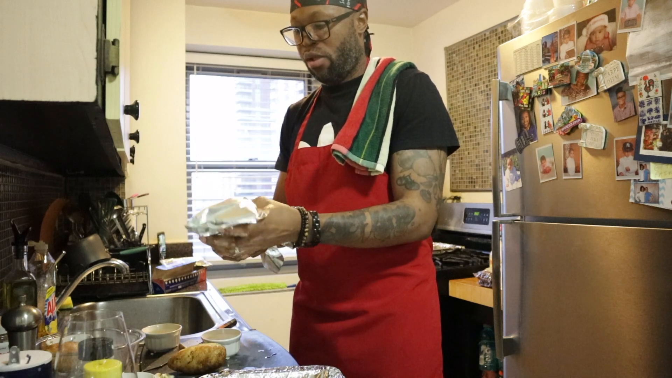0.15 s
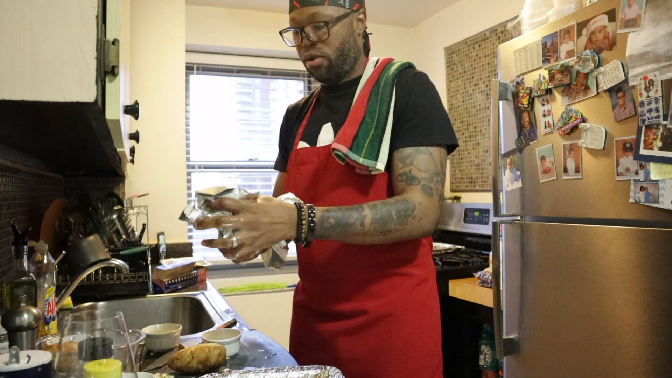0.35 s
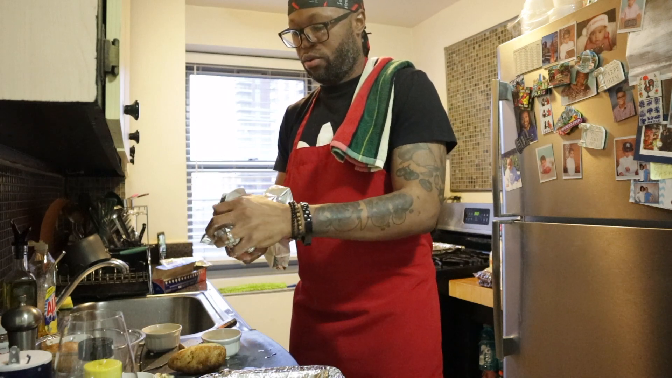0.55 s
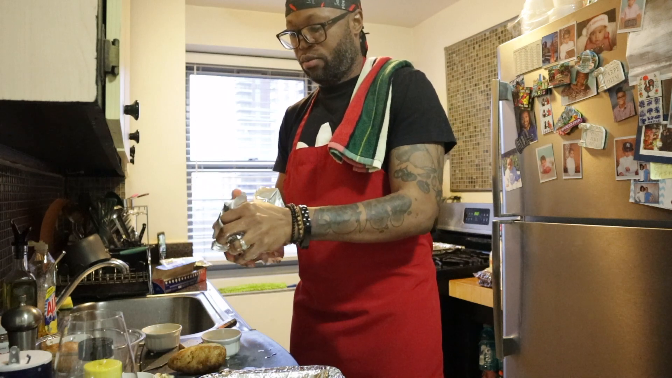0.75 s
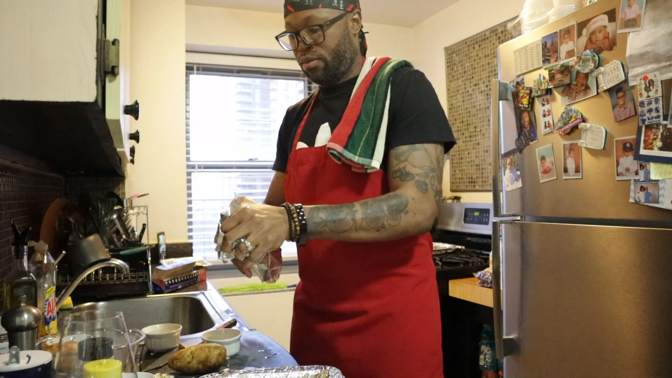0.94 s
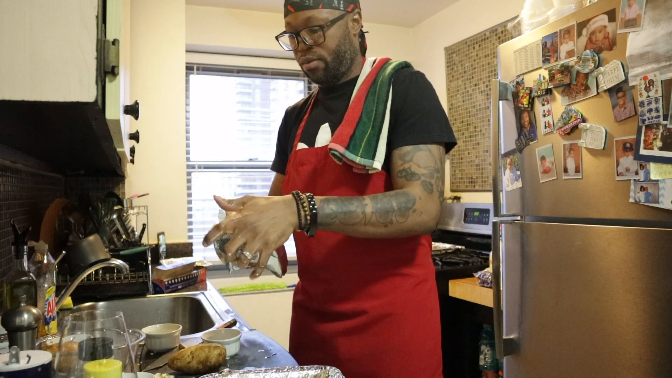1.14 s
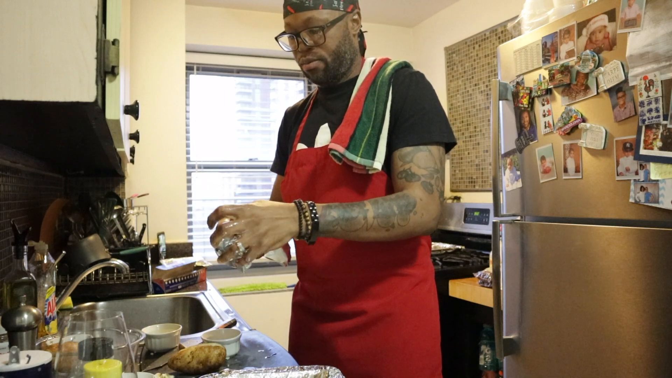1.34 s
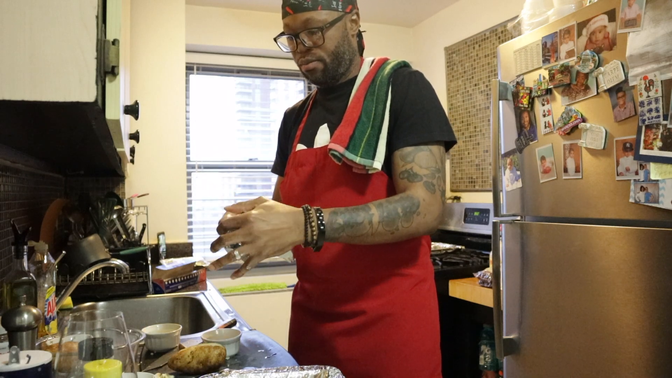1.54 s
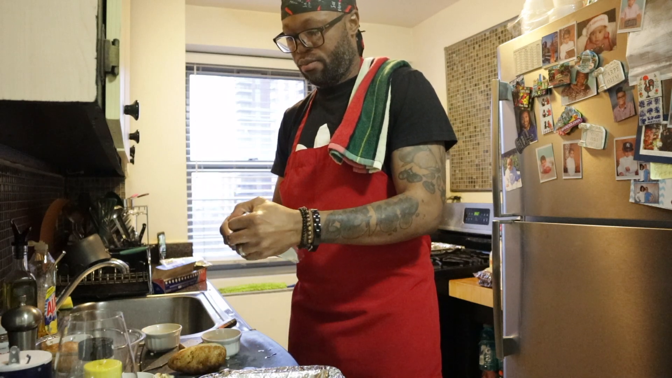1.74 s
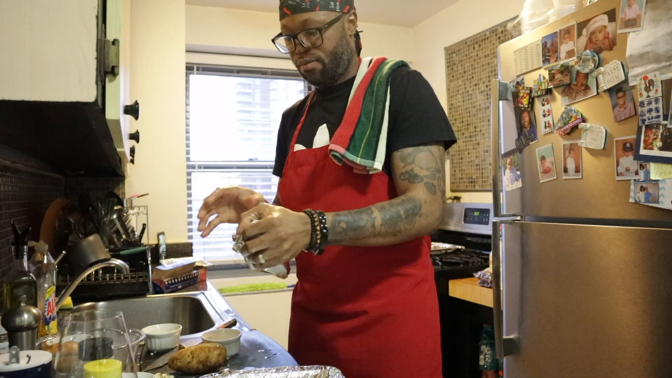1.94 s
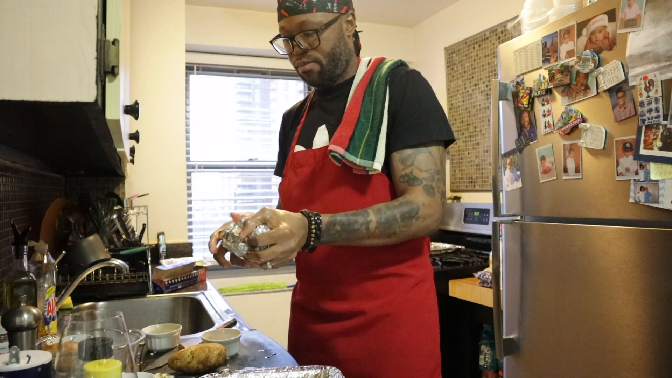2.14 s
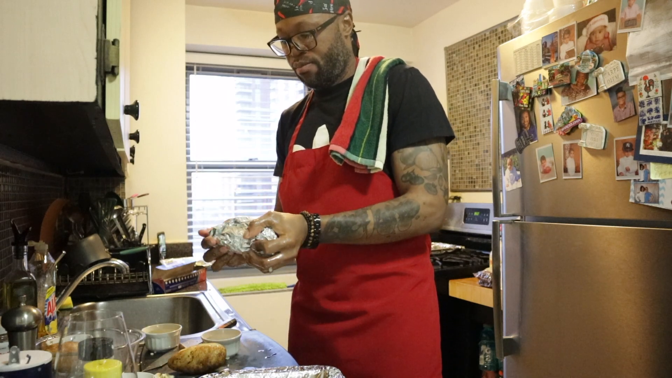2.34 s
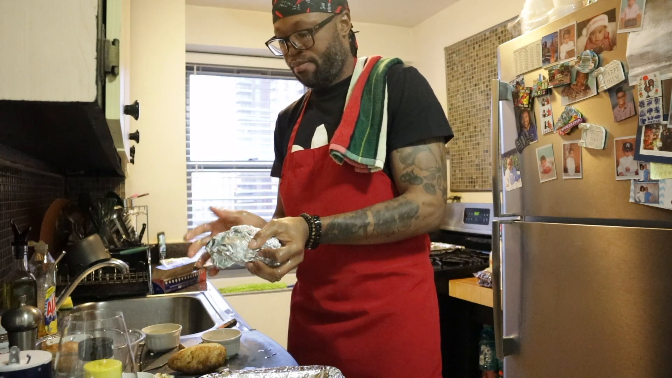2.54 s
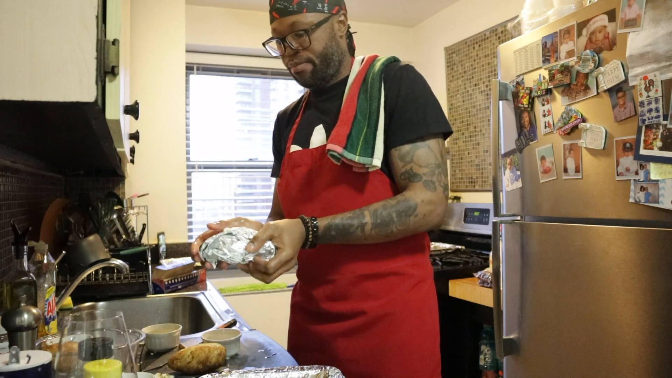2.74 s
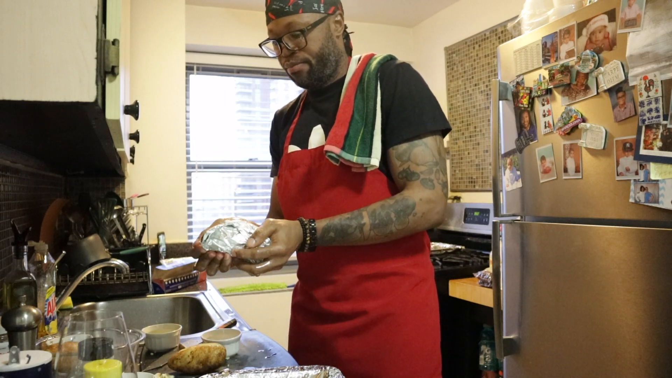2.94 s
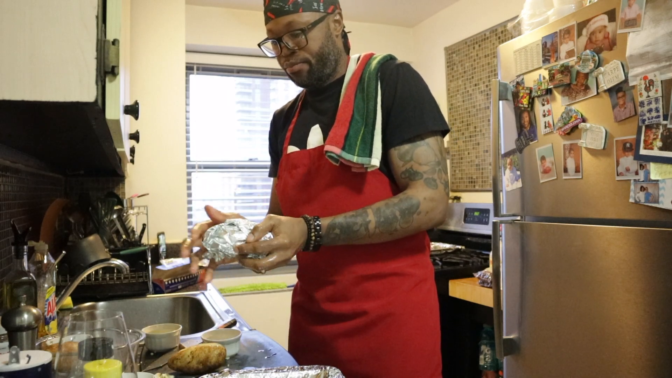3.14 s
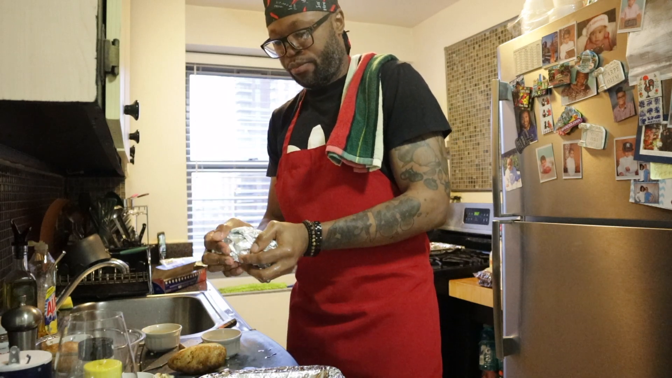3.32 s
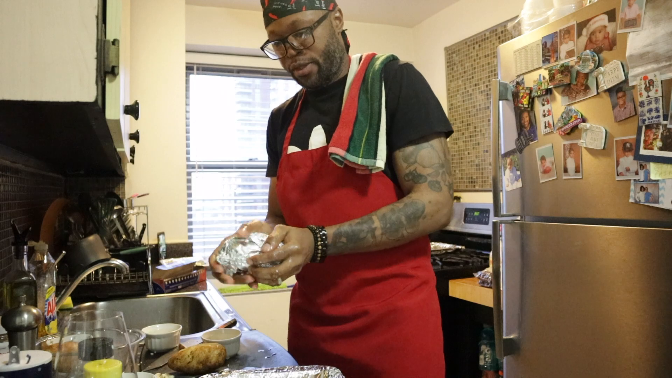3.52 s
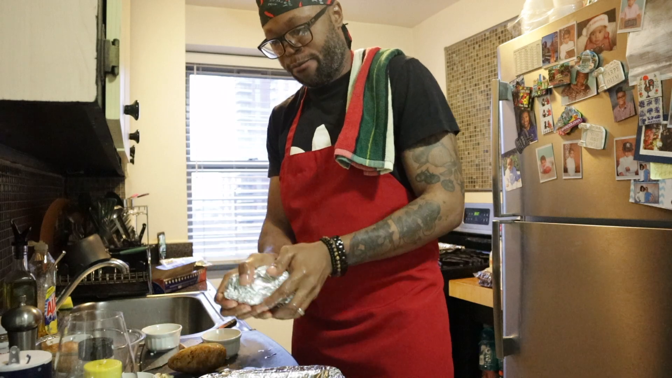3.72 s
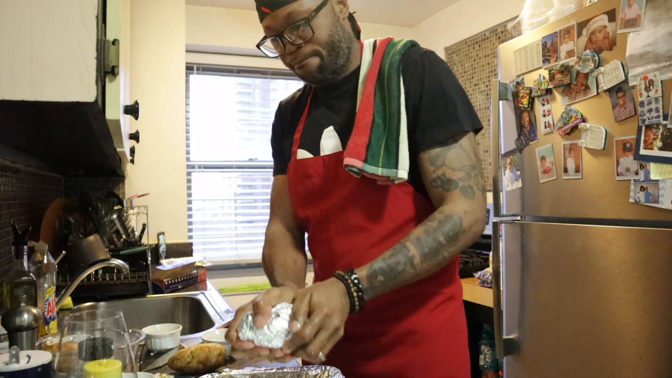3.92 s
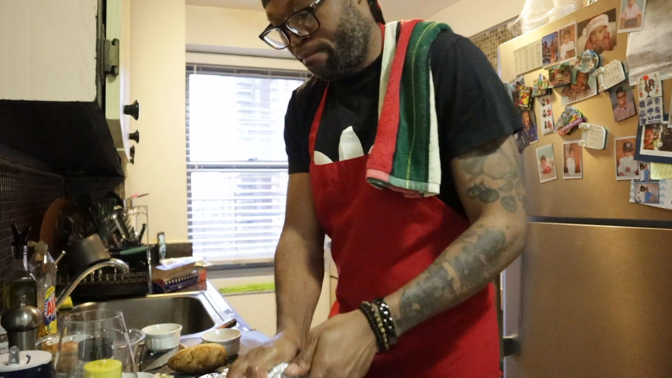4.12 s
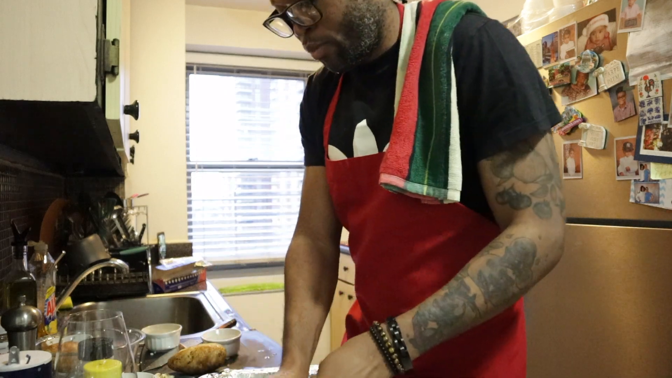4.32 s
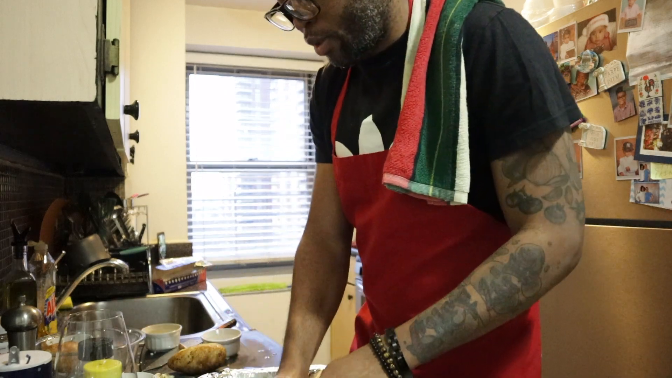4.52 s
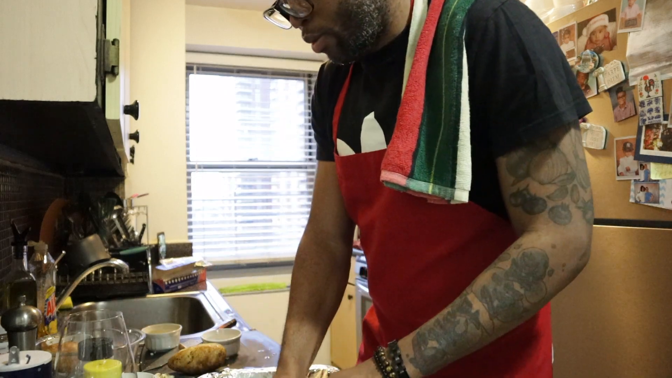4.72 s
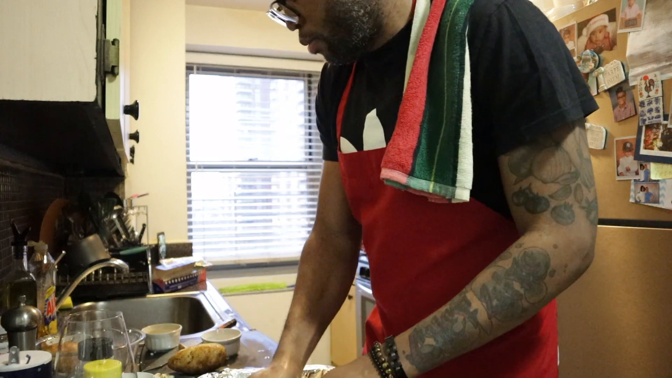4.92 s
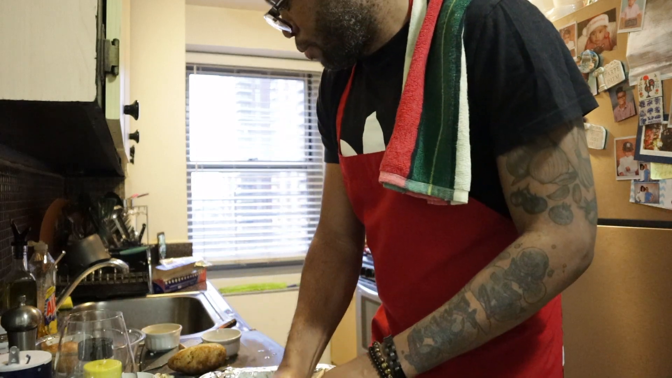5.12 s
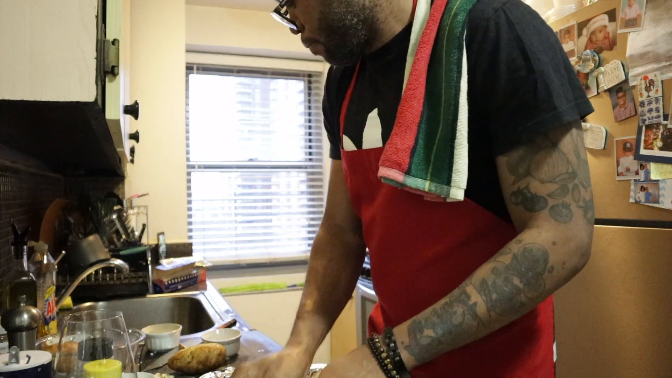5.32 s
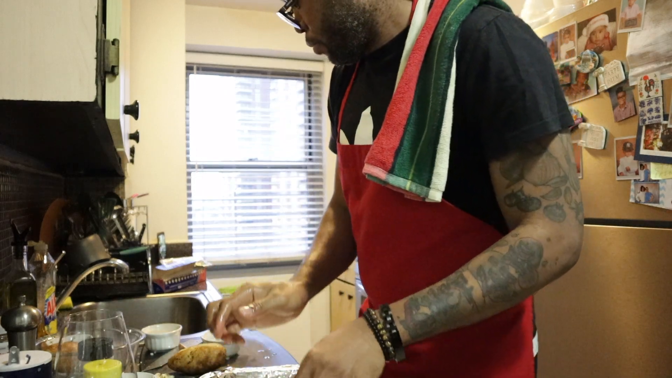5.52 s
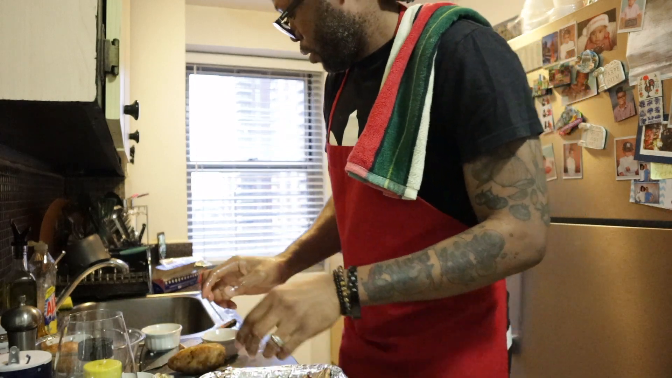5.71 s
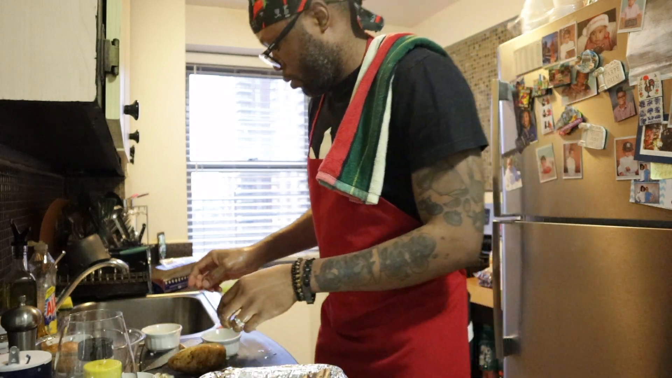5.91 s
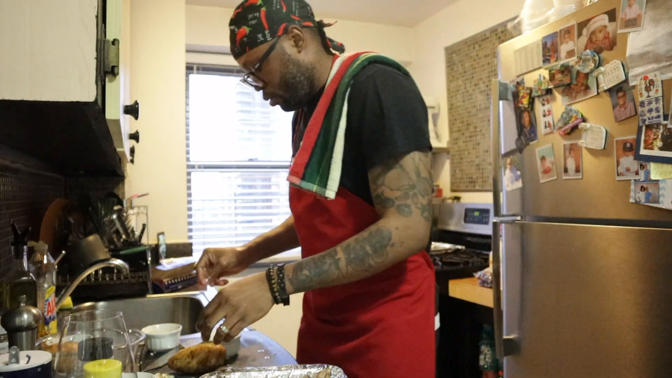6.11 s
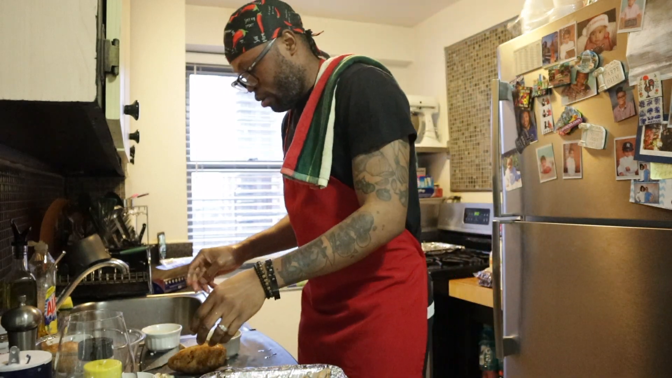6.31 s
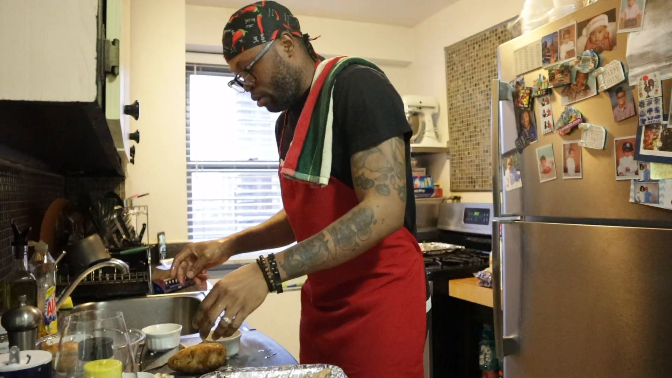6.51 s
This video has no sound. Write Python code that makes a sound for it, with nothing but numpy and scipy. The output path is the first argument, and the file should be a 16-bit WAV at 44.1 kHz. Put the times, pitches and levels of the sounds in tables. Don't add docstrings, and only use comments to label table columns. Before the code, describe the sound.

A small kitchen with a quiet low refrigerator hum and a short, lively echo, heard by a small camera microphone about a step away. From 0 s, aluminium foil is already crumpling loudly: bright, dry crackles in dense clumps, with strong snaps and ticks in the first quarter second and soft palm thumps near 0.2, 0.5 and 0.8 s. Squeezes continue to 2 s, then firmer pressing, patting and crisp popping folds until about 3.25 s. The foil eases to light rustles and small ticks from 3.4 to 4.2 s. Tucking brings louder, sharp snaps and boomier buckles from 4.35 to 5.1 s, thinning away by 5.5 s. Near 5.9 s a small bowl is knocked with short, dull ringing clunks and faint high squeaks, then drags with a gritty rasp, strongest from 6.3 to 6.45 s, ending in a tiny squeak and room hum.

```python
import sys
import numpy as np
from scipy import signal
from scipy.fft import rfft, irfft
from scipy.io import wavfile
from scipy.ndimage import uniform_filter1d

SR = 44100
rng = np.random.default_rng(int(sys.argv[2]) if len(sys.argv) > 2 else 0)


def transcribe(signal):
    frames = np.atleast_2d(signal).T
    limited = np.clip(frames, -1, 1)
    pcm = np.round(limited * 32767).astype(np.int16)
    wavfile.write(sys.argv[1], SR, pcm)


def convert_level_to_amplitude(level_db):
    exponent = np.asarray(level_db, float) / 20
    return 10 ** exponent


N = 289330

# (frequency [Hz], density [dB per Hz])
ROOM_SPECTRUM = [(15, -49), (25, -20), (80, -14.5), (120, -11), (137, -7.5), (157, -11.5), (242, -7.5),
                 (263, -7.5), (301, -8.5), (384, -9.5), (476, -12), (607, -17), (911, -17), (2160, -28.5),
                 (16000, -43)]
# (frequency [Hz], width [Hz], level [dB])
REFRIGERATOR_MODES = [(152.6, 8.3, -53), (85, 25, -58.5), (72.6, 33, -59.5), (241.5, 31, -56),
                      (287.4, 13, -55), (423.7, 18, -57.5)]
# (frequency [Hz], t60 [s])
KITCHEN_DECAY = [(300, 0.31), (1500, 0.36), (5000, 0.26), (14000, 0.15)]
# (frequency [Hz], gain [dB])
MICROPHONE_RESPONSE = [(3000, 0.5), (3600, 4), (4300, -1.5), (5150, 2.5), (6000, 1), (7500, 1)]

# (time [s], pressure [dB])
DRAG_PRESSURE = [
    (5.9, -60),
    (6.0, -50.5),
    (6.04, -44),
    (6.22, -49),
    (6.31, -26.5),
    (6.392, -26),
    (6.494, -35.5),
    (6.56, -53),
]
# (frequency [Hz], density [dB per Hz])
GRIT_SPECTRUM = [(300, -33), (600, -5.5), (1000, -4), (1700, -4.5), (2500, -3), (3600, -4.5), (5500, -8.5),
                 (8500, -23), (12700, -28), (16000, -39)]
# (time [s], peak [dB], clack [dB re peak])
BOWL_KNOCKS = [(5.872, -34, -19), (5.885, -32, -15), (5.897, -36, -5.5), (5.957, -19, -20),
               (5.972, -23, -21), (6.025, -37, -14), (6.225, -30, -16)]
# (frequency [Hz], level [dB], t60 [s])
BOWL_MODES = [(514, 5, 0.047), (724, 6, 0.048), (834, -2, 0.063), (1097, 6, 0.049), (1240, -11, 0.074),
              (2290, -12, .06)]
# (start [s], end [s], start pitch [Hz], end pitch [Hz], level [dB])
BOWL_SQUEAKS = [
    (5.823, 5.895, 11600, 12200, -68),
    (5.93, 5.99, 10000, 10200, -73),
    (6.495, 6.53, 12700, 13000, -64),
]

# (time [s], peak [dB], pitch [Hz])
PALM_PATS = [(.169, -22, 654), (.466, -20.5, 365), (.779, -17, 760), (1.829, -25, 557), (2.111, -21, 385),
             (2.139, -20.5, 500), (2.65, -25, 372), (3.769, -23, 785), (4.619, -32, 776), (.535, -17, 1210),
             (1.167, -20, 1450), (2.25, -14, 1410), (5.335, -27, 2220), (5.878, -30, 540)]
# (frequency [Hz], density [dB per Hz])
FOIL_SPECTRUM = [(290, -26.5), (500, -8.5), (970, 0.5), (2040, -1.5), (3530, -3), (5000, -2.5),
                 (7400, -8.5), (11400, -11), (16000, -17)]
# (time [s], large facets [dB re folds])
FOIL_SLACK = [(0, -5.5), (.9, -7.5), (1.3, -8), (1.7, -11.5), (2.1, -8), (2.3, -7), (2.6, -10), (3.2, -12),
              (3.6, -12), (3.9, -10), (4.2, -4.5), (4.4, -8), (4.6, -4), (5.0, -7.5), (5.6, -6)]
# (time [s], peak [dB])
CREASE_TICKS = [(0.0987, -27), (0.143, -23), (0.158, -11), (0.195, -7.5), (0.8878, -16), (1.0914, -18),
                (1.2894, -19), (1.8058, -25), (1.8362, -22), (2.5028, -15), (2.6458, -19), (2.9238, -23),
                (3.0145, -21.5), (3.1445, -12), (3.5848, -19.5), (3.6526, -23), (3.7678, -26),
                (3.8572, -18.5), (3.917, -21.5), (4.1917, -18), (4.346, -13), (4.472, -13.5), (4.5476, -15),
                (4.585, -9), (4.6246, -12.5), (4.9521, -26), (5.0495, -20), (5.1623, -22), (5.2629, -30),
                (5.4354, -27)]
# (time [s], peak [dB], ring [Hz], fine creases
# [dB re peak])
FOLD_SNAPS = [(0.0285, -18, 2120, -19), (0.0993, -11, 2550, -18), (0.1197, -14, 1940, -15),
              (0.1426, -10, 4830, -15), (0.194, -7, 4800, -18), (0.241, -15, 4870, -17),
              (0.6626, -13.5, 3700, -20), (0.823, -14.5, 3670, -26), (0.8874, -15, 5430, -10),
              (0.938, -18, 3430, -4), (1.0108, -12, 3500, -16), (1.0919, -10.5, 3470, -13),
              (1.167, -16, 2870, 1), (1.226, -14, 2400, -6), (1.2908, -11.5, 3000, -6),
              (1.3858, -18, 3620, -21), (1.4133, -20, 2920, -15), (1.4341, -14.5, 3080, -1),
              (1.514, -24, 3400, -18), (1.5268, -12.5, 3440, -19), (1.5509, -14, 3400, -20),
              (1.6743, -14, 3380, -7), (1.7857, -25, 2680, -11), (1.8074, -20, 3130, -15),
              (1.8382, -20, 3580, -15), (1.8997, -16, 3880, -17),
              (2.0835, -17, 2510, -8), (2.096, -17, 3530, -10), (2.1134, -16, 2280, -18),
                  (2.1855, -11.5, 3530, -13), (2.3072, -13, 3540, -16), (2.3484, -15, 3650, -18),
                  (2.4663, -14, 3420, -9), (2.5024, -19, 3670, -8), (2.5272, -10, 2170, -5),
                  (2.5994, -13, 2700, -0.5), (2.646, -12, 3420, -20), (2.7078, -12, 2670, -16),
                  (2.7753, -8, 2630, -14), (2.8241, -9.5, 3540, -26), (2.865, -27, 3670, -14),
                  (2.8929, -22, 3450, -12), (3.0146, -16.5, 5050, 2.5), (3.059, -22.5, 1980, -17),
                  (3.1149, -11, 2770, -11), (3.1445, -9.5, 3600, -11), (3.195, -11, 3620, -18),
                  (3.2246, -11.5, 3460, -13), (3.4247, -28, 3390, -18), (3.4546, -33, 3520, -9),
                  (3.471, -27, 3400, -13), (3.5757, -28, 3520, -5), (3.5913, -17, 4020, -16),
                  (3.6532, -19.5, 3720, -11),
              (3.7325, -24.5, 3600, -15), (3.7707, -24, 3520, -24), (3.8196, -20, 4790, -2),
                 (3.857, -23.5, 5450, -7), (3.9176, -29.5, 5500, -9), (3.942, -27, 2640, -15),
                 (4.1373, -25, 2360, -15), (4.1516, -21.5, 3520, -19), (4.2022, -18, 3370, -20),
                 (4.3438, -16.5, 5250, -4), (4.3653, -12.5, 4870, 4), (4.4708, -13, 4700, -15),
                 (4.505, -12, 5100, -17), (4.5468, -13, 3770, -1), (4.6226, -11, 3110, -22),
                 (4.6411, -9.5, 3510, -23), (4.6986, -11, 2090, -19), (4.8278, -22, 5330, -17),
                 (4.8451, -14.5, 2430, -23), (4.878, -24, 3400, -16), (4.9031, -9.5, 2340, -3),
                 (4.951, -8, 2390, -1), (4.976, -21, 4170, -16), (5, -14, 3530, -22),
                 (5.0595, -12, 2770, -18), (5.1644, -16, 4400, -17), (5.2413, -22.5, 3720, -13),
                 (5.2655, -24.5, 6360, 2), (5.3246, -20.5, 2250, -18), (5.4341, -27, 2200, -10)]
# (strongest at [s], rise [s], fall [s], level [dB], fine
# creases [dB re level])
FOIL_SQUEEZES = [(0.0, .05, 0.077, -28, -7.5), (0.17, 0.091, 0.062, -22.5, -10.5),
                 (0.35, 0.19, 0.18, -26.5, -9), (0.53, 0.28, 0.21, -26, -8.5),
                 (0.79, 0.17, 0.11, -28.5, -11), (0.95, 0.071, .06, -28, -9),
                 (1.06, 0.11, 0.092, -24, -9.5), (1.17, .01, 0.014, -24, -14),
                 (1.25, 0.044, 0.14, -26.5, -10), (1.55, .13, 0.094, -26, -9.5),
                 (1.67, 0.15, 0.071, -26.5, -9.5), (1.87, .09, 0.088, -25.5, -8.5),
                 (2.119, 0.029, 0.14, -21.5, -9), (2.26, 0.094, .22, -23.5, -10),
                 (2.54, 0.031, 0.16, -33, -11), (2.66, 0.032, 0.082, -25, -8.5),
                 (2.77, 0.13, 0.054, -25.5, -7), (2.93, .09, 0.092, -30.5, -7.5),
                 (3.14, 0.096, 0.036, -34.5, -5.5), (3.23, 0.11, .11, -31, -5),
                    (3.49, 0.051, 0.064, -29.5, -7.5), (3.6, 0.036, 0.19, -36, -7.5),
                    (3.772, 0.0075, 0.017, -27, -10), (3.87, .1, 0.11, -41.5, -2),
                    (4.16, 0.075, 0.031, -39, -5.5), (4.21, 0.028, 0.096, -37.5, -8),
                    (4.386, 0.032, 0.061, -22, -2), (4.52, 0.2, 0.14, -27.5, -8.5),
                    (4.66, 0.13, 0.17, -29.5, -5), (4.86, 0.14, 0.095, -39.5, -6),
                    (4.99, 0.13, .13, -30, -6.5), (5.17, .01, 0.037, -43, -10),
                    (5.27, 0.025, 0.039, -46, -1), (5.33, .015, 0.021, -36, -7),
                    (5.42, 0.12, 0.076, -46, -6)]


def evened(x):
    return x / np.sqrt(np.mean(x ** 2) + 1e-20)


def wander(count, size):
    return evened(uniform_filter1d(rng.standard_normal(count), size))


def read(points, hz):
    f, value = np.transpose(points)
    return np.interp(np.log(hz + 1), np.log(f + 1), value)


def along(rows):
    return np.interp(np.arange(N) / SR, *np.transpose(rows))


def add(mix, s, sound):
    part = mix[round(s * SR):][:len(sound)]
    part += sound[:len(part)]


def butter(order, hz, kind):
    return signal.butter(N=order, Wn=hz, btype=kind, fs=SR, output="sos")


def colour(points):
    hz = abs(np.fft.fftfreq(4096, 1 / SR))
    log_gain = np.log(convert_level_to_amplitude(np.maximum(read(points, hz), -90)))
    return np.fft.ifft(np.exp(np.conj(signal.hilbert(log_gain)))).real[:1024]


def coloured(x, points):
    return signal.oaconvolve(x, colour(points))[:len(x)]


def sizes(x, low_hz=1800, high_hz=6500):
    large = signal.sosfilt(butter(3, low_hz, "low"), x)
    under = signal.sosfilt(butter(3, high_hz, "low"), x)
    middle = signal.sosfilt(butter(3, low_hz, "high"), under)
    fine = signal.sosfilt(butter(3, high_hz, "high"), x)
    return evened(large), evened(middle), evened(fine)


def played(x, large, middle, fine):
    return sum(gain * part for gain, part in zip((large, middle, fine), sizes(x)))


def facet(x, hz, spread):
    edges = np.minimum([hz / spread, hz * spread], [0.4 * SR, 0.45 * SR])
    return 0.74 * x + 1.65 * signal.sosfilt(butter(1, edges, "band"), x)


def buckle(hz, ring_db, crack_t60, ring_t60, size):
    t = np.arange(size) / SR
    crack = facet(rng.standard_normal(size) * convert_level_to_amplitude(-60 * t / crack_t60), hz, spread=1.43)
    rattle = sum(np.sin(2 * np.pi * hz * f * t) for f in rng.uniform(0.76, 1.2, size=6))
    return crack + convert_level_to_amplitude(ring_db - 60 * t / ring_t60) * rattle


def grains(per_s, spread_db, clump_db, clump_s, crack_t60, count=14):
    clumps = wander(N, max(round(clump_s * SR), 2))
    struck = rng.random(N) < per_s / SR
    size = rng.integers(0, count, N)
    strength = np.minimum(rng.exponential(1, N), 4)
    train = convert_level_to_amplitude(spread_db * strength + clump_db * clumps) * struck
    power_decay = convert_level_to_amplitude(-120 / (crack_t60 * SR))
    out = np.zeros(N)
    for k, hz in enumerate(np.geomspace(700, 13000, num=count)):
        dying = signal.lfilter([1], [1, -power_decay], (train * (size == k)) ** 2)
        busy = convert_level_to_amplitude(2.5 * wander(N, round(0.06 * SR)))
        out += facet(busy * np.sqrt(dying) * rng.standard_normal(N), hz, spread=1.63)
    return out


def room_tone():
    hz = np.fft.rfftfreq(N, 1 / SR)
    air = irfft(rfft(rng.standard_normal(N)) * convert_level_to_amplitude(read(ROOM_SPECTRUM, hz)), N)
    out = convert_level_to_amplitude(-45) * evened(air)
    for mode_hz, width_hz, db in REFRIGERATOR_MODES:
        resonance = 1 / (1 + (2 * (hz - mode_hz) / width_hz) ** 2)
        out += convert_level_to_amplitude(db) * evened(irfft(rfft(rng.standard_normal(N)) * resonance, N))
    return out


def kitchen_echo(x, turns_per_s=4.7):
    at, out = np.arange(200, SR // 2 - 20, 20), np.zeros(N)
    for k in range(3):
        taps = np.zeros(SR // 2)
        taps[at + rng.integers(0, 20, len(at))] = rng.choice([-1.0, 1.0], len(at))
        hz, t, z = signal.stft(taps, SR, nperseg=256)
        decay = convert_level_to_amplitude(-60 * t / read(KITCHEN_DECAY, hz)[:, None])
        tail = signal.istft(z * decay, SR, nperseg=256)[1]
        turn = turns_per_s * np.arange(N) / SR + k / 3
        share = np.sqrt(2 / 3) * np.cos(2 * np.pi * turn)
        out += signal.oaconvolve(x * share, tail / np.linalg.norm(tail))[:N]
    return out


def bowl_drag():
    rasp = grains(per_s=6000, spread_db=2.0, clump_db=1.2, clump_s=0.0073, crack_t60=0.027)
    press_db = along([(DRAG_PRESSURE[0][0] - 0.05, -130)] + DRAG_PRESSURE)
    eased_db = 0.68 * (press_db - press_db.max())
    return played(coloured(rasp, GRIT_SPECTRUM), large=convert_level_to_amplitude(-37.5 + eased_db),
                  middle=convert_level_to_amplitude(press_db - 2.0), fine=convert_level_to_amplitude(-43.5 + eased_db))


def bowl_knocks():
    out, t = np.zeros(N), np.arange(6000) / SR
    for s, peak_db, clack_db in BOWL_KNOCKS:
        ring = sum(convert_level_to_amplitude(db - 60 * t / t60) * np.sin(2 * np.pi * hz * t) for hz, db, t60 in BOWL_MODES)
        add(out, s, convert_level_to_amplitude(peak_db - 5.0) * ring / abs(ring).max())
        clack = sizes(buckle(2550, ring_db=-25, crack_t60=0.2, ring_t60=0.05, size=4000))[1]
        add(out, s, convert_level_to_amplitude(peak_db + clack_db - 4) * clack / 4)
    return out


def bowl_squeaks():
    out = np.zeros(N)
    for start, end, from_hz, to_hz, db in BOWL_SQUEAKS:
        glide = np.linspace(from_hz, to_hz, round((end - start) * SR))
        hz = glide + 120 * wander(len(glide), 150)
        tone = np.sin(2 * np.pi * np.cumsum(hz) / SR)
        add(out, start, convert_level_to_amplitude(db + 3) * tone * signal.windows.tukey(len(hz), 0.4))
    return out


def palm_pats():
    out, t = np.zeros(N), np.arange(1600) / SR
    for s, peak_db, hz in PALM_PATS:
        front = 1 - np.exp(-t / 0.00023)
        add(out, s, convert_level_to_amplitude(peak_db - 5.0 - 60 * t / 0.029) * np.sin(2 * np.pi * hz * t) * front)
    return out


def crease_ticks():
    out = np.zeros(N)
    for s, peak_db in CREASE_TICKS:
        flip = buckle(11400, ring_db=-27, crack_t60=0.018, ring_t60=0.011, size=600)
        tick = sizes(coloured(flip, FOIL_SPECTRUM), high_hz=6950)[2]
        add(out, s, convert_level_to_amplitude(peak_db - 3.0) * tick / abs(tick).max())
    return out


def fold_snaps():
    out, t, slack_db = np.zeros(N), np.arange(1600) / SR, along(FOIL_SLACK)
    for s, peak_db, hz, fine_db in FOLD_SNAPS:
        flip = buckle(hz, ring_db=-21, crack_t60=0.03, ring_t60=0.018, size=1600)
        large, middle, fine = sizes(coloured(flip, FOIL_SPECTRUM))
        boom_db = -4.5 + slack_db[round(s * SR)] - 0.5 * np.log2(hz / 3500) + 8 * rng.uniform(-0.65, 1)
        fold = convert_level_to_amplitude(boom_db) * large + middle + convert_level_to_amplitude(fine_db - 4.5 - 60 * t / 0.11) * fine
        add(out, s, convert_level_to_amplitude(peak_db - 2.5) * fold / abs(middle).max())
    return out


def squeeze_envelopes(rustle_end_s):
    t = np.arange(0, N + 32, 32) / SR
    folds = convert_level_to_amplitude(2 * (-58 - 60 * np.maximum(t - rustle_end_s, 0)))
    fine = folds * convert_level_to_amplitude(2 * -6.0)
    for top, rise, fall, db, fine_db in FOIL_SQUEEZES:
        away = np.where(t < top, (top - t) / rise, (t - top) / fall)
        power = convert_level_to_amplitude(-2 * 12.5 * away ** 1.62)
        folds = folds + power * convert_level_to_amplitude(2 * db)
        fine = fine + power ** 0.92 * convert_level_to_amplitude(2 * (db + fine_db))
    return [convert_level_to_amplitude(-2.0) * np.sqrt(np.interp(np.arange(N) / SR, t, p)) for p in (folds, fine)]


def crackle():
    rustle_end_s = 5.3
    folds, fine = squeeze_envelopes(rustle_end_s)
    dense = grains(per_s=1900, spread_db=3.2, clump_db=1.0, clump_s=0.013, crack_t60=0.011)
    crumple = played(coloured(dense, FOIL_SPECTRUM), large=folds * convert_level_to_amplitude(along(FOIL_SLACK)),
                     middle=folds, fine=fine)
    needles = grains(per_s=110, spread_db=2.5, clump_db=1.2, clump_s=0.04, crack_t60=0.0025)
    handled = along([(rustle_end_s, 1), (rustle_end_s + 0.29, 0)]) * convert_level_to_amplitude(-18)
    share = 0.74
    lone = played(coloured(needles, FOIL_SPECTRUM), large=0,
                  middle=handled * folds ** share, fine=handled * fine ** share)
    return crumple + lone


def shaded(foil, set_down_s=4.46, share=0.56):
    top = signal.sosfiltfilt(butter(2, 11000, "high"), foil)
    return foil - along([(set_down_s - 0.05, 0), (set_down_s + 0.05, share)]) * top


def scene():
    bowl = bowl_drag() + bowl_knocks() + bowl_squeaks()
    foil = palm_pats() + crease_ticks() + fold_snaps() + crackle()
    near = shaded(foil) + bowl
    return (room_tone() + convert_level_to_amplitude(-5.5) * kitchen_echo(near) + near)[None]


def roll_off(x):
    return signal.sosfilt(signal.butter(12, 16830, fs=SR, output="sos"), x)


def record(dry):
    heard = coloured(dry[0], MICROPHONE_RESPONSE)
    band_limit = signal.firwin(511, 15880, window=("kaiser", 9), fs=SR)
    limited = signal.oaconvolve(heard, band_limit, "same")
    return roll_off(limited[None])


dry = scene()
out = record(dry)
transcribe(out)
```